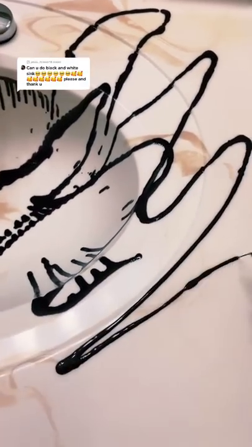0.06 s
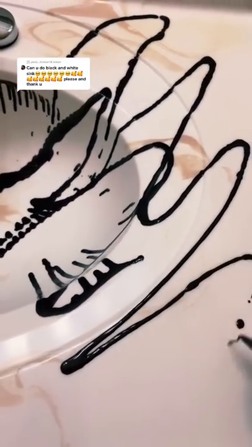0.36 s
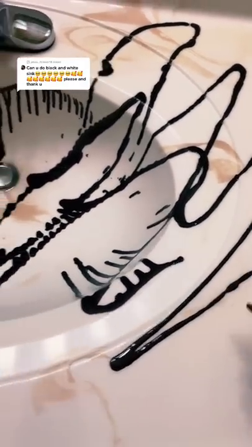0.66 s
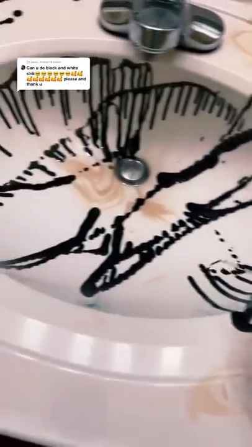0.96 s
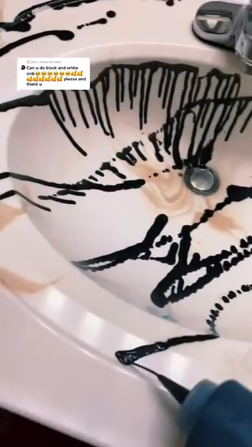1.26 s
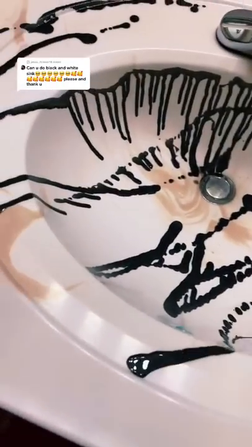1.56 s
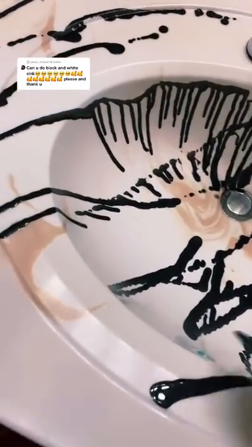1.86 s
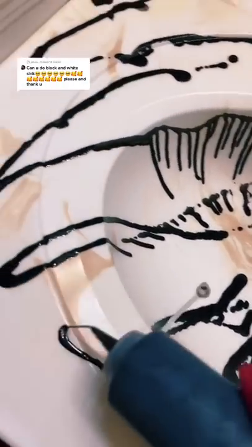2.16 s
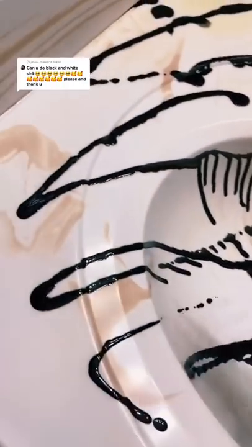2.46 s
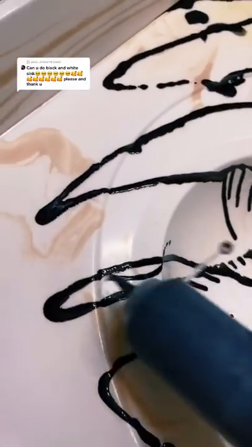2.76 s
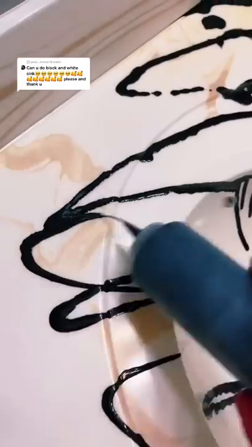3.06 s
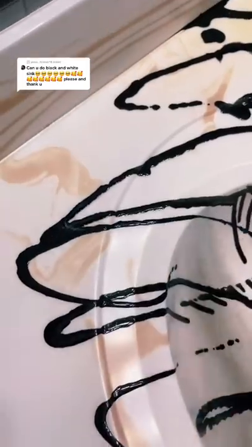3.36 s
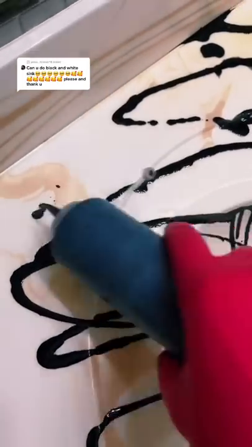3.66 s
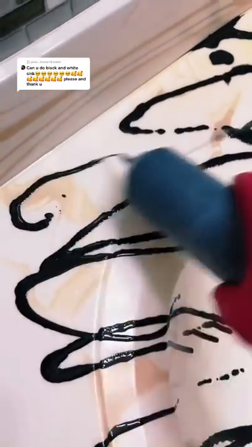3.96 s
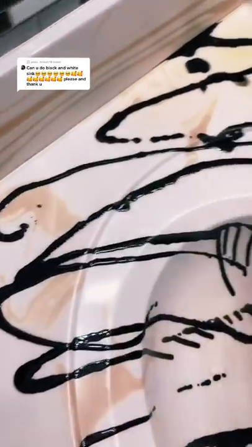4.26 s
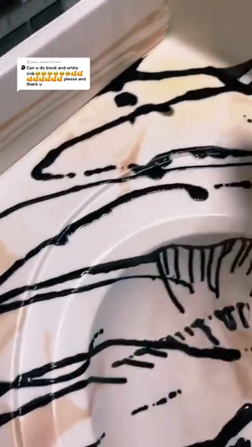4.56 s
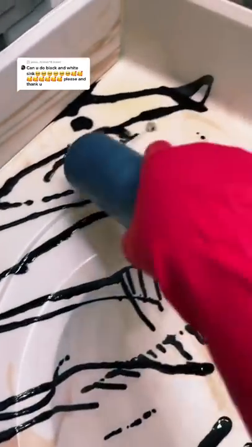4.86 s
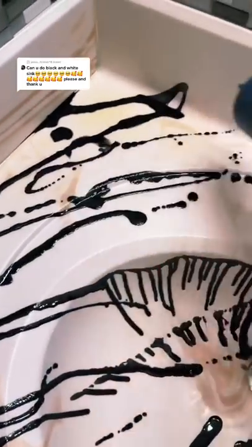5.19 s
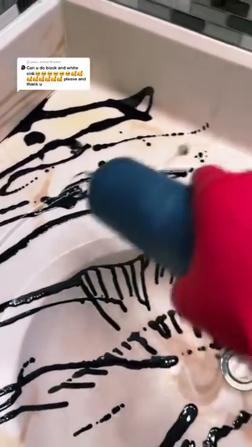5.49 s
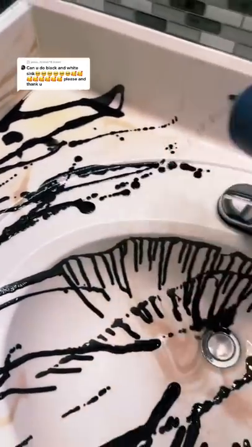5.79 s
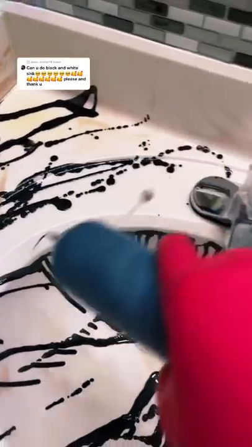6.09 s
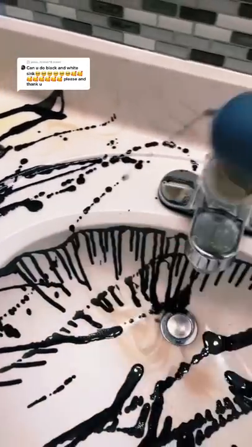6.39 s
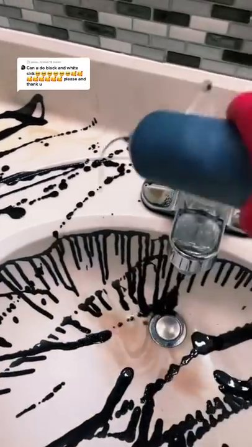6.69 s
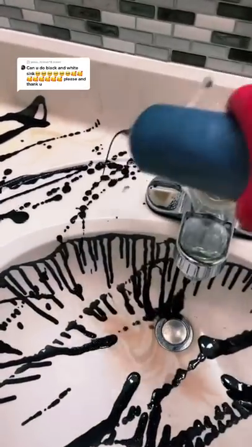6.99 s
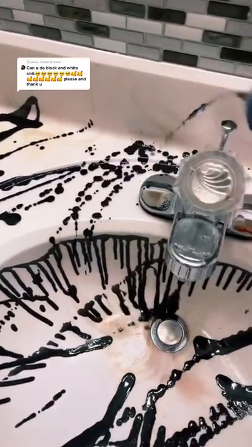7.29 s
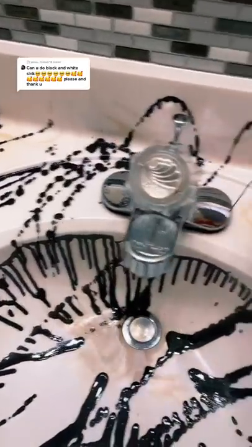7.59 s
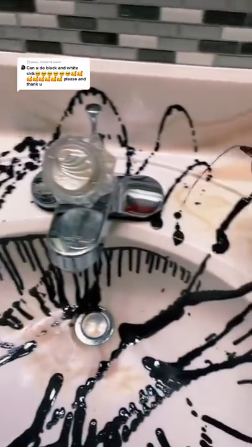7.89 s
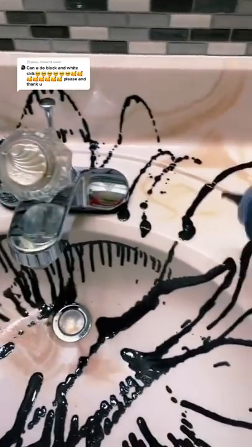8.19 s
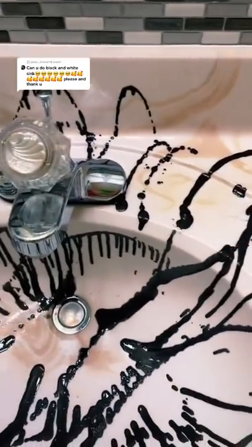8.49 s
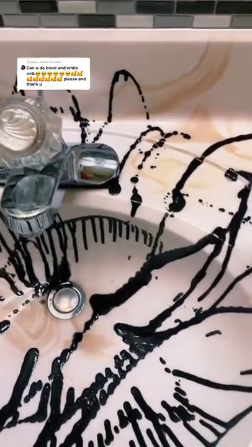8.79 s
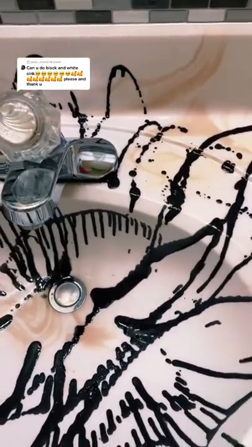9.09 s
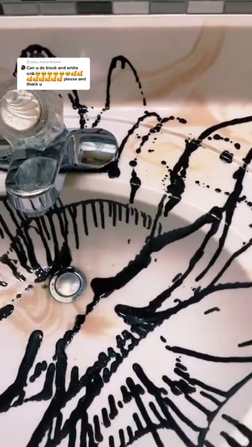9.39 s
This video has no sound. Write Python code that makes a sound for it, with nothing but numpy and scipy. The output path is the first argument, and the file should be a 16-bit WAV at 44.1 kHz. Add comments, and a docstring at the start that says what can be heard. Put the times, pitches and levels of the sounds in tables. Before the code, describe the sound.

A squeeze bottle softly plops, clicks and sputters paint in a small bathroom, interrupted midway by a sharp knock against the hollow basin.

```python
"""In a small tiled bathroom, thick paint is squeezed from a plastic bottle over a sink top.
Bubbles snap, the nozzle spits and hisses as air pushes past the paint, and plopping blobs make the
bottle ring. A gloved hand swishes past and something knocks against the hollow basin. Near the end
the bottle runs low and sputters air and paint. A fan hums low behind it all."""
import sys
import numpy as np
from scipy import signal
from scipy.fft import rfft, irfft
from scipy.io import wavfile

SR = 44100
rng = np.random.default_rng(int(sys.argv[2]) if len(sys.argv) > 2 else 0)


def output_pcm(signal):
    """Save a mono or channel-first signal as 16-bit PCM at the path in sys.argv[1].

    Samples are clipped to [-1, 1] before scaling.
    """
    pcm = np.clip(np.atleast_2d(signal).T, -1, 1) * 32767
    wavfile.write(sys.argv[1], SR, np.round(pcm).astype(np.int16))


N = 416744
TIME = np.arange(N) / SR
BRIEF = TIME[:6000]  # time line for one short sound
RUNS_LOW_S = 6.6, 7.8  # the bottle starts to draw air, and does so fully

# tone colours of wet gurgle, fine spray and bursting crackle: f/Hz, relative level/dB
GURGLE = [(400, -16), (750, -10), (1230, 3), (1800, -3.5), (2800, -5.5), (4500, -13), (7000, -19),
          (15000, -27.5)]
SPRAY = [(1500, -8), (4000, 0), (7000, -4), (10300, 2), (14000, 0), (15500, -0.5), (16500, -10)]
CRACKLE = [(400, 6), (1200, -4), (2900, 1.3), (4500, -2), (6200, -10.5), (9500, -16), (15000, -16.5),
           (16500, -24)]


def from_db(db):
    """Turn decibels into a number to multiply by."""
    return 10 ** (np.asarray(db) / 20)


def rms_one(x):
    """Scale a sound to an average strength (rms) of 1."""
    return x / np.sqrt(np.mean(x ** 2) + 1e-20)


def at_hz(points, hz):
    """Read between the rows of a table, giving each octave equal room."""
    known_hz, values = np.transpose(points)
    return np.interp(np.log(np.maximum(hz, 1)), np.log(known_hz), values)


def band(x, low_hz, high_hz, order=2):
    """Let through what lies between two frequencies."""
    edges = [low_hz, min(high_hz, SR / 2 - 1)]
    return signal.sosfilt(signal.butter(order, edges, "band", fs=SR, output="sos"), x)


def colour(x, spectrum):
    """Give a sound a tone colour; plain noise keeps its strength."""
    size = 2048
    gains = from_db(at_hz(spectrum, np.fft.rfftfreq(size, 1 / SR)))
    cepstrum = irfft(np.log(gains))
    first_half = np.arange(size) < size // 2  # so nothing rings before the sound starts
    response = irfft(np.exp(rfft(2 * cepstrum * first_half)))
    return signal.oaconvolve(x, response / np.linalg.norm(response))[:len(x)]


def drift(per_s):
    """A slow random wobble, about 1 in size."""
    points = rng.standard_normal(2048)
    return np.interp(TIME * per_s, np.arange(len(points)), points)


def grains(count, per_s, spread_db):
    """Tiny random clicks of uneven size."""
    clicks = (rng.random(count) < per_s / SR) * rng.choice([-1, 1], count)
    sizes = from_db(spread_db * np.minimum(rng.exponential(1, count), 4))
    return rms_one(clicks * sizes)


def add(track, s, sound):
    """Mix a sound into a track, s seconds in."""
    start = int(s * SR)
    track[start:start + len(sound)] += sound[:max(N - start, 0)]


def snap(decay_s):
    """A tiny burst of noise that dies at once."""
    return rng.standard_normal(len(BRIEF)) * np.exp(-BRIEF / decay_s)


def pop(start_hz, end_hz, glide_s, decay_s):
    """A paint film tears: the pitch slides to that of the air pocket as the ring dies."""
    hz = end_hz + (start_hz - end_hz) * np.exp(-BRIEF / glide_s)
    return np.sin(2 * np.pi * np.cumsum(hz) / SR) * np.exp(-BRIEF / decay_s)


def squelch(rise_s, decay_s):
    """Wet crackle builds as the paint's skin stretches, peaks after four rise times and dies."""
    since_peak = BRIEF - 4 * rise_s
    swell = np.exp(np.minimum(since_peak / rise_s, -since_peak / decay_s))
    return grains(len(BRIEF), per_s=3000, spread_db=3.5) * swell


def background():
    """The room's soft rush, a thin high hiss and the slightly wavering hum of a fan."""
    # tone colour of the rush: f/Hz, relative level/dB
    room_tone = [(65, -4), (103, -11.5), (220, -18.5), (350, -19.5), (700, -26.5), (1300, -28), (2500, -31),
                 (4000, -36), (6750, -44), (15800, -48)]
    # loudness over time: t/s, rush/dB, high hiss/dB
    levels = [(0, -68.5, -81), (0.6, -64, -84), (2.7, -64.5, -79.5), (4.2, -61.5, -79), (4.5, -60, -72.5),
              (5.2, -62.5, -73.5), (7.4, -63, -76), (9.45, -59, -77)]
    s, rush_db, treble_db = np.transpose(levels)
    rush = rms_one(band(colour(rng.standard_normal(N), room_tone), 58.8, 24000))
    rush *= from_db(np.interp(TIME, s, rush_db) + .5 * drift(4.1))
    treble = colour(rng.standard_normal(N), SPRAY)
    treble *= from_db(np.interp(TIME, s, treble_db) + 0.7 * drift(12))
    fan_hz, fan_db = 46, -58
    cycles = fan_hz * TIME + .04 * drift(8)
    hum = from_db(fan_db + 1.9 * drift(8.3)) * np.sqrt(2) * np.sin(2 * np.pi * cycles)
    return rush + treble + hum


def bubbles():
    """A bubble's skin crackles and clicks apart, then rings briefly, rising in pitch as it opens."""
    # small bubbles breaking: t/s, ring/dB, rough pitch/Hz, click/dB
    breaks = [(0.069, -60, 1170, -68), (0.528, -59, 1190, -69), (0.72, -51, 690, -57),
              (2.624, -45, 5330, -54), (4.623, -55, 3000, -47.5), (5.193, -51, 1370, -66),
              (5.359, -47, 564, -65), (5.375, -43, 803, -45), (5.376, -42.5, 4600, -54),
              (5.783, -39.5, 1980, -50), (6.665, -54, 2410, -53), (6.76, -51, 2660, -50),
              (6.769, -39.5, 3070, -46.5), (7.141, -41.5, 836, -46.5), (7.248, -41.5, 2790, -48.5),
              (7.920, -46, 2560, -40.5), (8.361, -47.5, 2880, -53), (8.715, -40.5, 2950, -70),
              (8.8297, -39, 682, -62), (9.277, -47, 3280, -46.5), (9.372, -34, 1400, -57)]
    rings, clicks, rise_s = np.zeros(N), np.zeros(N), .005
    for s, ring_db, hz, click_db in breaks:
        ring = pop(hz * 0.89, hz * 1.1, glide_s=3.2 / hz, decay_s=3.3 / hz)
        add(rings, s, from_db(ring_db + 1.3) * ring)
        add(clicks, s, from_db(click_db + 0.5) * snap(0.0015))
        add(clicks, s - 4 * rise_s, from_db(click_db - 13.0) * squelch(rise_s, decay_s=0.0056))
    return rings + colour(clicks, CRACKLE)


def spits():
    """Air squelches up the nozzle and breaks through with a bright crack and a short ring."""
    # sharp spits: t/s, crack/dB, rough pitch/Hz, ring/dB
    bursts = [(0.291, -40.5, 3020, -44), (0.4311, -58, 2850, -51.5), (1.6276, -46, 4300, -50),
              (1.9974, -35, 1250, -40)]
    cracks, rings, wet, rise_s = np.zeros(N), np.zeros(N), np.zeros(N), .005
    for s, crack_db, hz, ring_db in bursts:
        add(cracks, s, from_db(crack_db + 1) * (snap(0.0013) + from_db(-19.5) * snap(0.0096)))
        ring = pop(hz * 1.45, hz * 0.965, glide_s=0.0008, decay_s=0.002)
        add(rings, s, from_db(ring_db + 5.0) * ring)
        add(rings, s, from_db(ring_db + 1.0) * band(snap(0.012), 700, 4400))
        add(wet, s - 4 * rise_s, from_db(ring_db - 13.0) * squelch(rise_s, decay_s=0.018))
    return colour(cracks, SPRAY) + rings + colour(wet, CRACKLE)


def bumps():
    """Handling makes soft bumps: low tones that quickly swell and fade."""
    # bumps: t/s, level/dB, f/Hz
    nudges = [(.645, -55, 82), (2.02, -54, 119), (2.562, -45, 56), (4.675, -48, 73.5), (4.665, -50, 137),
              (5.615, -55, 155), (7.105, -45, 188), (7.14, -42.5, 123), (7.73, -54.5, 185),
              (7.79, -52.5, 149), (8.22, -54, 135)]
    out, length_s = np.zeros(N), 0.05
    swell = np.sin(np.pi * np.minimum(BRIEF / length_s, 1))
    for s, level_db, hz in nudges:
        add(out, s, from_db(level_db) * swell * np.sin(2 * np.pi * hz * BRIEF))
    return out


def blobs():
    """Each plop is a quick falling chirp, no two alike, that sets the bottle ringing."""
    # blobs of paint: t/s, bright start/dB, hollow note/dB
    plops = [(0.715, -64, -55.5), (2.303, -57.5, -56.5), (2.471, -51.5, -52), (2.624, -71, -53.5),
             (2.730, -60.5, -52.5), (3.037, -53.5, -51), (3.629, -49, -47.5)]
    # notes of the half-empty bottle: f/Hz, level/dB, time to fade by 60 dB/s
    bottle_notes = [(275, 1.5, 0.25), (351, 1.5, 0.3), (524, -1.5, 0.13), (590, -5.5, .16)]
    chirps, hollow, bottle_ring = np.zeros(N), np.zeros(N), ringing(bottle_notes)
    pitch_factors = 2 ** rng.normal(0, 0.12, len(plops))
    for (s, bright_db, hollow_db), pitch in zip(plops, pitch_factors):
        high = pop(2600 * pitch, 1050 * pitch, glide_s=0.00267, decay_s=0.0057)
        low = pop(900 * pitch, 310 * pitch, glide_s=0.0041, decay_s=0.0082)
        add(chirps, s, from_db(bright_db + 2.0) * high)
        add(chirps, s + 0.00196, from_db(hollow_db - 2.5) * low)
        add(hollow, s + 0.00504, from_db(hollow_db - 5.5) * bottle_ring)
    return chirps, hollow


def ringing(notes):
    """A tapped object rings with its own fading notes; neighbours swing opposite ways."""
    t = TIME[:SR]
    return sum((-1) ** k * from_db(db - 60 * t / fade_s) * np.sin(2 * np.pi * hz * t)
               for k, (hz, db, fade_s) in enumerate(notes))


def hiss():
    """Each squeeze swells and fades, forcing air past the paint as dense fine crackle."""
    # squeezes: peak t/s, gurgle/dB, spray/dB, swell time/s
    squeezes = [(0.717, -72, -69, .04), (0.874, -64, -77, .12), (1.086, -66.5, -64, .1),
                (1.66, -61, -60, .03), (1.721, -47.3, -66, .037), (1.889, -65, -63, .05),
                (2.008, -48, -62, .029), (2.215, -71, -69.5, .12), (4.405, -72, -59, .025),
                (6.066, -61.5, -59.5, .072), (6.405, -66, -65.5, .065), (6.967, -63.5, -69, .026),
                (8.885, -58, -63, .044)]
    gurgle_power, spray_power = 0, 0
    for s, gurgle_db, spray_db, swell_s in squeezes:
        flow = np.exp(-np.minimum(np.abs(TIME - s) / swell_s, 20))
        gurgle_power += (from_db(gurgle_db) * flow) ** 2
        spray_power += (from_db(spray_db) * flow) ** 2
    wet = np.sqrt(gurgle_power) * colour(grains(N, per_s=3500, spread_db=3.0), GURGLE)
    fine = np.sqrt(spray_power) * colour(grains(N, per_s=4100, spread_db=1.5), SPRAY)
    return wet + fine


def sputters():
    """An air pocket swells and bursts with a falling pop; smaller ones follow in a wet crackle."""
    # air pockets in the nozzle: t/s, level/dB, pocket pitch/Hz, crackle/dB
    pockets = [(1.229, -53, 830, -64), (7.522, -62, 794, -54.5), (7.575, -64, 940, -53.5),
               (7.712, -52.5, 730, -52), (7.798, -43, 860, -47.5), (8.026, -44, 750, -47.5),
               (8.119, -44.5, 640, -51.5), (8.131, -50, 800, -53), (8.223, -50, 1063, -50),
               (8.342, -53, 775, -61), (8.458, -52, 795, -60), (8.474, -49, 520, -47.5),
               (8.642, -46.5, 670, -58), (8.779, -52, 944, -64), (8.827, -37.5, 617, -50),
               (8.906, -54, 640, -41.5), (8.93, -50, 830, -41), (8.997, -51.5, 757, -51.5),
               (9.089, -37.5, 786, -47), (9.189, -55, 775, -63), (9.305, -52, 546, -54),
               (9.417, -48.5, 553, -67)]
    pops, crackle, rise_s = np.zeros(N), np.zeros(N), .003
    for s, level_db, hz, crackle_db in pockets:
        add(pops, s, from_db(level_db + 2.5) * pop(2940, hz, glide_s=0.0007, decay_s=0.0055))
        add(pops, s + 0.0019, from_db(level_db + 9) * band(snap(0.012), 363, 900, order=3))
        small_db = level_db - 2 + .35 * (crackle_db - level_db)  # partly follows the crackle
        for delay_s, octaves in zip(rng.uniform(0.00207, 0.018, 4), rng.normal(0, 0.67, 4)):
            small_pop = pop(3360, hz * 2 ** octaves, glide_s=0.00085, decay_s=0.0019)
            add(pops, s + delay_s, from_db(small_db) * small_pop)
        wet = from_db(crackle_db + 1.5) * squelch(rise_s, decay_s=0.007)
        add(crackle, s + 0.000985 - 4 * rise_s, wet)
    return band(pops + colour(crackle, CRACKLE), 290, 20000)


def swishes():
    """The glove's fine rubbing rises and falls with the speed of the hand."""
    # sweeps of the hand: middle t/s, level/dB, length/s
    sweeps = [(3.2, -67.5, .14), (4.015, -63.5, .3), (4.56, -63.5, .3)]
    # tone colour of the rubbing: f/Hz, relative level/dB
    rub_tone = [(600, -12), (1300, -1), (2500, 0.5), (4000, -7), (6500, -16), (15000, -23)]
    speed = sum(from_db(level_db) * np.cos(np.pi * np.clip((TIME - s) / length_s, -.5, .5))
                for s, level_db, length_s in sweeps)
    return speed * colour(grains(N, per_s=6000, spread_db=1.5), rub_tone)


def basin():
    """Blows click and set the hollow basin ringing; a longer contact gives a duller thud."""
    # blows: t/s, level/dB, contact time/s, click/dB
    blows = [(4.349, -20.5, 0.0012, -52), (4.356, -18.5, 0.00039, -46.5), (4.3692, -33.5, 0.00023, -60),
             (4.3879, -19.5, 0.0021, -42), (7.111, -38, 0.0036, -55), (7.143, -42.5, 0.0038, -64),
             (7.165, -40, 0.0029, -60)]
    # notes of the basin and its counter: f/Hz, level/dB, time to fade by 60 dB/s
    basin_notes = [(72.2, -20, 0.5), (118.7, -22.5, 0.4), (138, -17.5, 0.65), (173.3, -16.5, 0.43),
                   (202.6, -14.5, 0.31), (217.6, -18, 0.47), (244.3, -14.5, 0.33), (281.5, -15, 0.26),
                   (363, -9.5, 0.1), (415, -4.5, 0.31), (438, -2.5, 0.18), (474, -26, 0.52),
                   (468, -22, 0.33), (505.5, 0.5, 0.12), (553, -8, 0.094), (610, -29.5, 0.38),
                   (635, -15, 0.13), (685, -18.5, 0.34), (734, -15, 0.14), (810, -31, .4), (859, -22, 0.24),
                   (924, -25, 0.17), (1030, -25, 0.16), (1155, -38, 0.33), (1264, -21.5, 0.071),
                   (1626, -34, 0.13), (1850, -44, .14), (2150, -36, 0.15)]
    force, clicks = np.zeros(N), np.zeros(N)
    for s, level_db, contact_s, click_db in blows:
        push = np.sin(np.pi * np.minimum(BRIEF / contact_s, 1)) ** 2
        add(force, s, from_db(level_db) * push / push.sum())
        add(clicks, s, from_db(click_db) * snap(0.009))
    return signal.oaconvolve(force, ringing(basin_notes))[:N], colour(clicks, GURGLE)


def sticky_ticks():
    """Sticky paint crackles faintly once the bottle runs low."""
    per_s = np.interp(TIME, RUNS_LOW_S, [0, 10.0])
    ticks = (rng.random(N) < per_s / SR) * from_db(rng.uniform(-65, -62.5, N))
    return colour(signal.oaconvolve(ticks, snap(0.0036))[:N], SPRAY)


def puffs():
    """Short thin puffs of spray come at random as the bottle runs low."""
    per_s, length_s = np.interp(TIME, RUNS_LOW_S, [0, 6]), .045
    starts = (rng.random(N) < per_s / SR).astype(float)
    swell = np.sin(np.pi * np.minimum(BRIEF / length_s, 1))
    flow = np.minimum(signal.oaconvolve(starts, swell)[:N], 1)
    spray = rms_one(band(grains(N, per_s=5000, spread_db=1.5), 9500, 18000))
    return from_db(-68) * flow * spray


def tile_echo(build_s):
    """Dense echoes off the tiles build up and die away, the highest ones fastest."""
    # the room's echo: f/Hz, time to fade by 60 dB/s
    fade_times = [(200, 0.37), (530, 0.41), (1400, 0.28), (3700, 0.26), (10000, 0.19)]
    t, echo = TIME[:SR // 2], 0
    edges_hz = np.geomspace(90, 18000, 9)
    for low, high in zip(edges_hz, edges_hz[1:]):
        fade = from_db(-60 * t / at_hz(fade_times, np.sqrt(low * high)))
        echo += band(rng.standard_normal(len(t)), low, high) * fade
    echo *= 1 - np.exp(-t / build_s)
    return echo / np.linalg.norm(echo)


def scene():
    """Mix the close sounds, their echo and the background."""
    sputter, spit = sputters(), spits()
    snaps = bubbles() + sticky_ticks()
    air = hiss() + swishes() + puffs()
    plops, hollow = blobs()
    ring, clicks = basin()
    direct = plops + hollow + sputter + spit + snaps + air + ring + clicks + bumps()
    to_walls = (from_db(-3.5) * plops + from_db(-6.5) * sputter + from_db(-2.0) * clicks
                + from_db(-4.0) * spit + from_db(-7.0) * snaps + from_db(-9.5) * air
                + from_db(-16.0) * ring)
    echo = signal.oaconvolve(to_walls, tile_echo(build_s=0.0035))[:N]
    return (direct + echo + background())[None]


def record(dry):
    """The microphone's opening softens part of the high treble; the very top is cut steeply."""
    softened = dry - .5 * band(dry, 10850, 13400, order=1)
    cutoff_hz = 15850
    return signal.sosfilt(signal.ellip(12, .1, 70, cutoff_hz, fs=SR, output="sos"), softened)


dry = scene()
out = record(dry)
output_pcm(out)
```